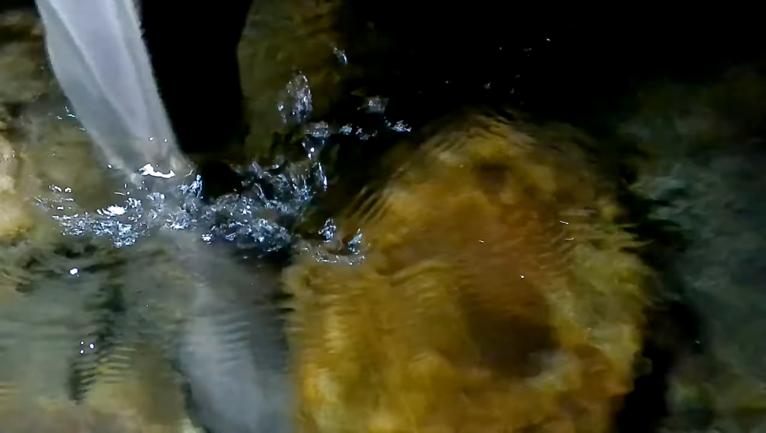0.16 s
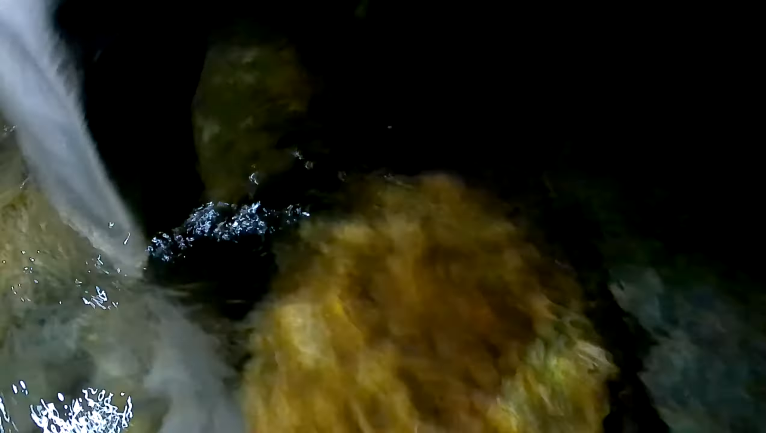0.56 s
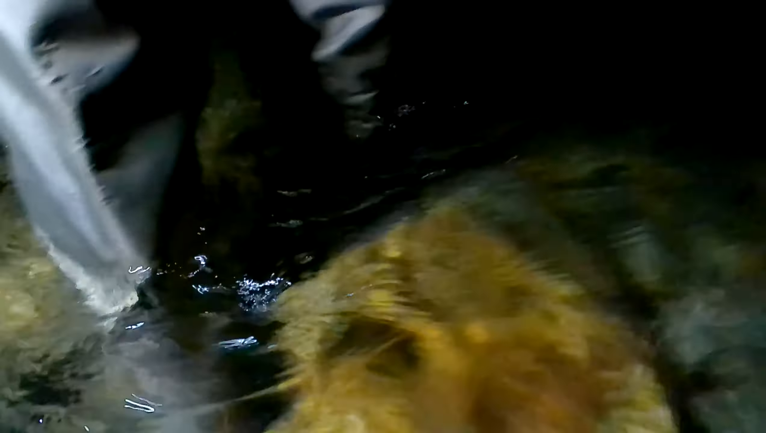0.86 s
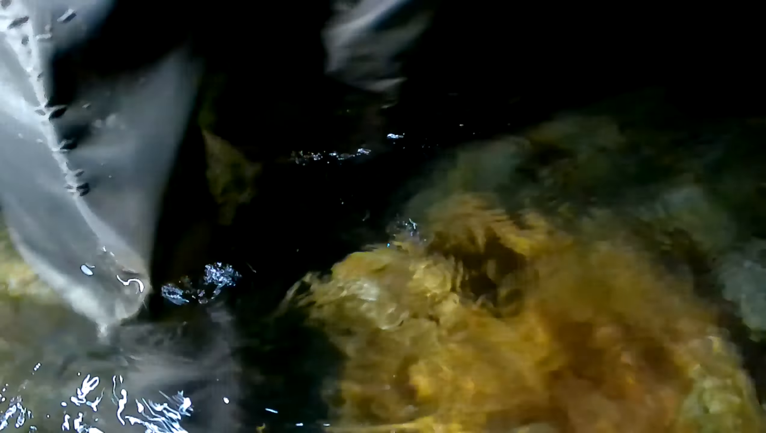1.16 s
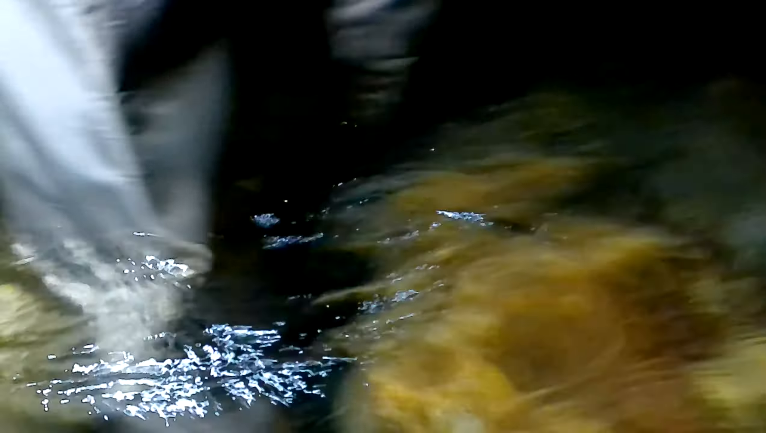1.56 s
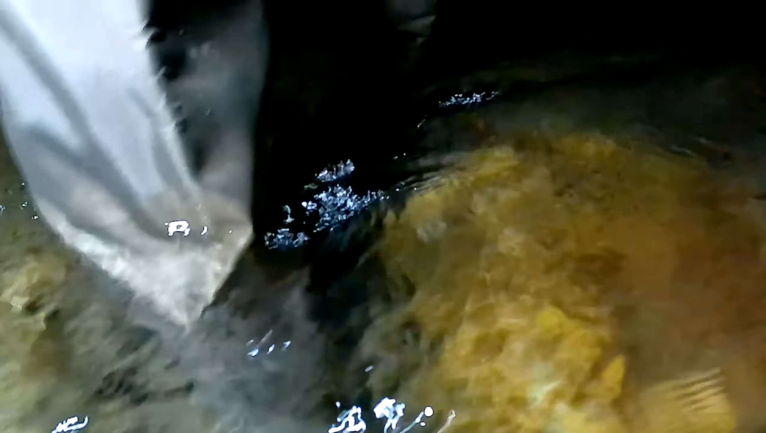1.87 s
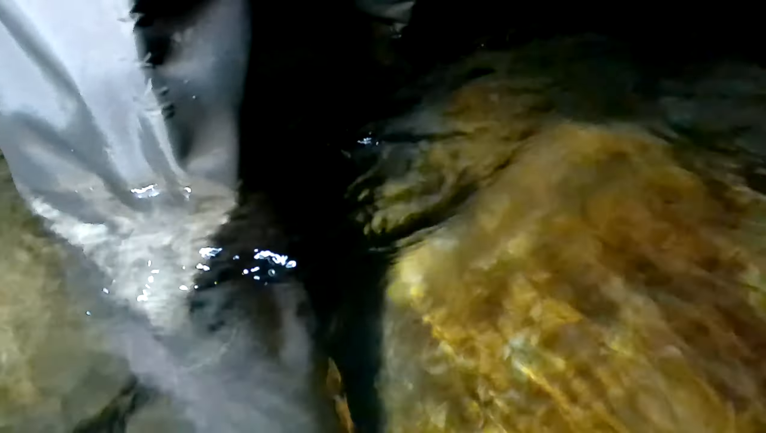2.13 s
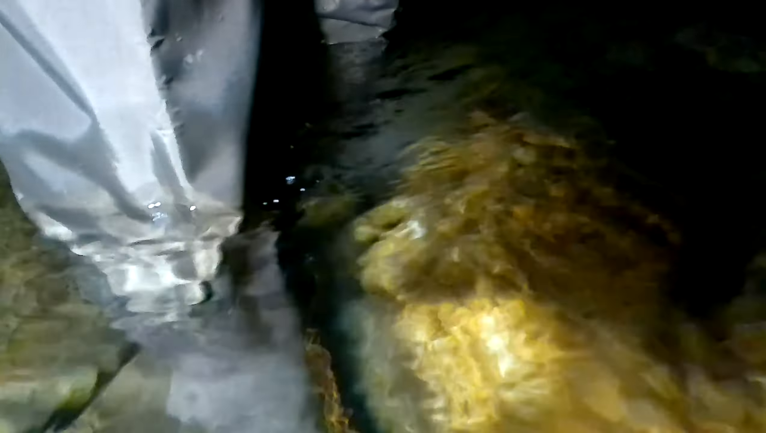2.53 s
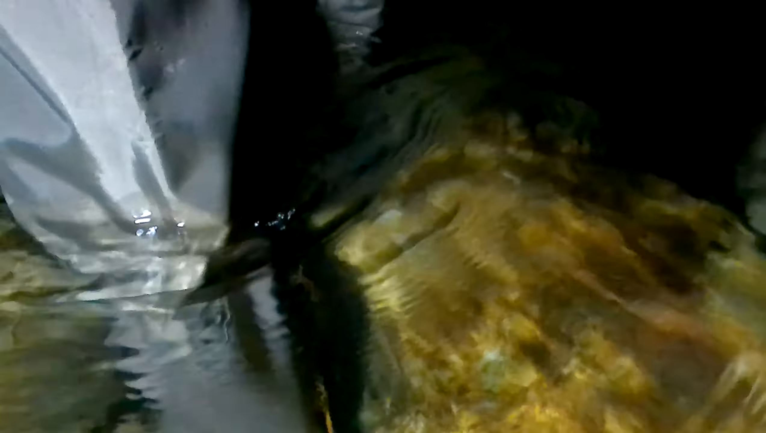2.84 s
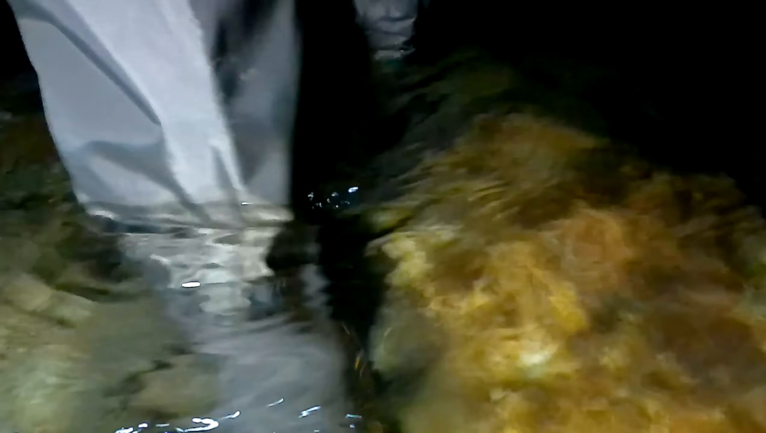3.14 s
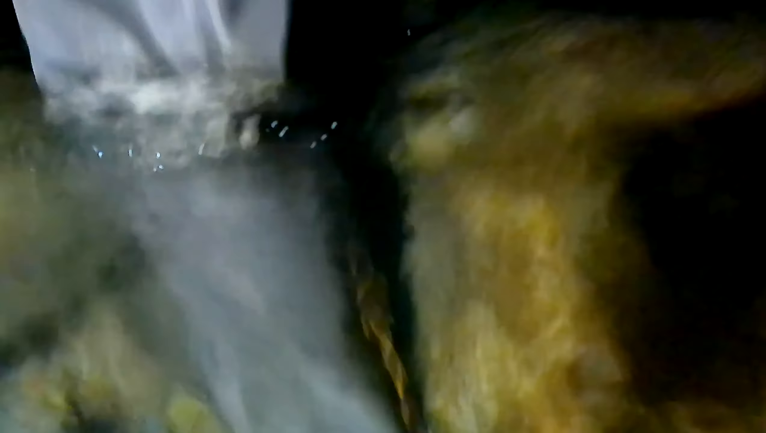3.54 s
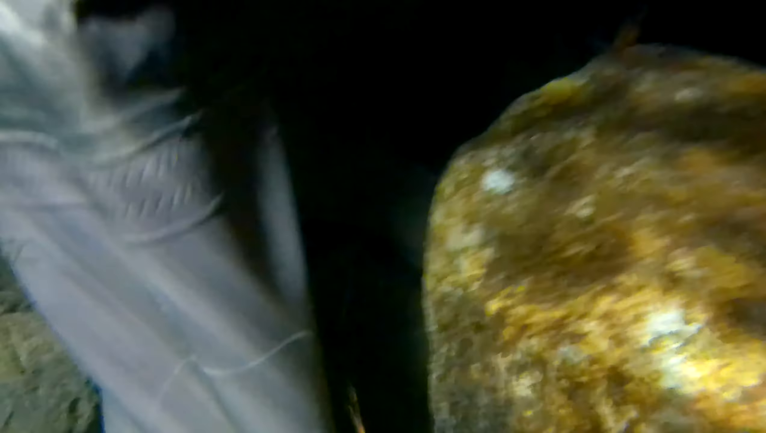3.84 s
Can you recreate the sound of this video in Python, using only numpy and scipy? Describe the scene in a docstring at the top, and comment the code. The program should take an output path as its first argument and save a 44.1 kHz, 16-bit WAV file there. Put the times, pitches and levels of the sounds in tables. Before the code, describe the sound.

Plunge into a rocky stream: faint water bed, handling knocks and small gurgles heard through a hollow waterproof case, nearly two quiet seconds, then abrupt overloaded splash, fizz and falling bubble tones right at the microphone.

```python
"""Over a faint, slowly swelling river bed of filtered noise, someone wades with a microphone in a waterproof case.
Swishes (grains of noise, small bubbles) and knocks of the grip excite the hollow resonances of the case;
low thumps, pushes, faint surface gurgles and touches of fizz join them.
Late on the case plunges under: churning and slaps are shaped noise, and trapped air rings as loud
gliding sines, with bursts of fizz on top; the loudest bubbles overload the microphone."""
import sys
import numpy as np
from scipy import signal
from scipy.io import wavfile
from scipy.ndimage import uniform_filter1d

SR = 44100
rng = np.random.default_rng(int(sys.argv[2]) if len(sys.argv) > 2 else 0)


def log_audio(samples):
    """Write samples as a 16-bit WAV file to the path given in sys.argv[1]."""
    # one column per channel
    frames = np.atleast_2d(samples).T
    # limit to full scale, then quantise
    limited = np.clip(frames, -1, 1)
    pcm = np.round(limited * 32767).astype(np.int16)
    wavfile.write(sys.argv[1], SR, pcm)


N = 176400  # samples: 4 s


def amp(db):
    """Turns decibels into a gain."""
    return 10 ** (np.asarray(db) / 20)


def unit(x):
    """Scales a sound to an RMS of one."""
    return x / np.sqrt(np.mean(x ** 2) + 1e-20)


def add(mix, s, sound):
    """Mixes a sound in at a time in seconds, cut off at the end of the mix."""
    part = mix[max(round(s * SR), 0):][:len(sound)]
    part += sound[:len(part)]


def level(rows, axis=1):
    """Gain over the whole scene from a column of dB values."""
    rows = np.array(rows)
    return amp(np.interp(np.arange(N) / SR, rows[:, 0], rows[:, axis]))


def colour(x, points, size=8192):
    """Minimum-phase filter of unit energy that follows a spectrum, so nothing sounds early."""
    f, db = np.transpose(points)
    hz = abs(np.fft.fftfreq(size, 1 / SR))
    log_gain = np.log(amp(np.interp(np.log(hz + 1), np.log(f), db)))
    spectrum = np.exp(np.conj(signal.hilbert(log_gain)))
    response = np.fft.ifft(spectrum).real[:size // 2]
    return signal.oaconvolve(x, response / np.linalg.norm(response))[:N]


def strike(rise, t60):
    """Envelope: a quick rise, then an exponential fall of 60 dB per t60."""
    t = np.arange(0, rise + 2 * t60, 1 / SR)
    attack = np.sin(np.pi / 2 * np.minimum(t / rise, 1)) ** 2
    decay = np.exp(-np.log(1000) * np.maximum(t - rise / 2, 0) / t60)
    return attack * decay


def bursts(rows):
    """Short puffs of noise from rows of (time [s], level [dB], t60 [s], rise [s])."""
    envelope = np.zeros(N)
    for s, db, t60, rise in rows:
        add(envelope, s, amp(db) * strike(rise, t60))
    return envelope * rng.choice([-1., 1.], N)


def drift(size):
    """Slow random wander of unit RMS: noise smoothed twice over size samples."""
    smooth = uniform_filter1d(rng.standard_normal(N), size)
    return unit(uniform_filter1d(smooth, size))


GRAINS_PER_S, GRAIN_SPREAD_DB = 1800, 3.5  # the spread scales an exponential draw, held to 4


def grains():
    """A dense crackle of clicks of uneven size, at unit RMS."""
    size = amp(GRAIN_SPREAD_DB * np.minimum(rng.exponential(1, N), 4))
    sign = rng.choice([-1., 1.], N)
    return unit(size * sign * (rng.random(N) < GRAINS_PER_S / SR))


def ring(x, modes):
    """Passes a sound through decaying modes, each of unit energy times its gain."""
    t = np.arange(SR // 4) / SR
    response = np.zeros(len(t))
    for k, (hz, db, t60) in enumerate(modes):
        mode = np.exp(-np.log(1000) * t / t60) * np.sin(2 * np.pi * hz * t)
        response += amp(db) * unit(mode) * (-1) ** k  # neighbouring modes have opposite sign
    return signal.oaconvolve(x, response / np.sqrt(len(t)))[:N]


BUBBLE_RISE_CYCLES = 1.1
WOBBLE_CYCLES, BUBBLE_WOBBLE = 2, 0.053  # cycles per random step, relative pitch spread
SURFACING_CLIMB_PER_S, SINKING_FALL_PER_S = 0.4, 0.88  # relative pitch change


def bubble(hz, db, t60, rise, glide):
    """A pocket of air rings at one gliding, slightly wobbling pitch."""
    envelope = strike(rise, t60)
    t = np.arange(len(envelope)) / SR
    wobble = np.interp(t * hz / WOBBLE_CYCLES, np.arange(512), rng.standard_normal(512))
    pitch = hz * np.exp(glide * t) * (1 + BUBBLE_WOBBLE * wobble)
    return amp(db) * envelope * np.sin(2 * np.pi * np.cumsum(pitch) / SR)


def froth(low_hz, high_hz, per_s, cycles, size=N):
    """Many small climbing bubbles of scattered pitch, each with a t60 of the same number of cycles."""
    out = np.zeros(size)
    count = int(per_s * size / SR) + 1
    for when, pitch, strength in rng.random((count, 3)):
        hz = low_hz * (high_hz / low_hz) ** pitch
        pop = bubble(hz, 0, cycles / hz, BUBBLE_RISE_CYCLES / hz, SURFACING_CLIMB_PER_S)
        add(out, when * size / SR, strength * pop)
    return unit(out)


# spectrum of quiet river and microphone hiss: (frequency [Hz], relative density [dB])
RIVER_SPECTRUM = [(30, 2.5), (60, -12.5), (220, -23.5), (1100, -35.5), (1480, -26), (2000, -36.5),
                  (2750, -45), (3500, -37.5), (8000, -49)]
RIVER_DB = -65.5
RUMBLE_SWELL_DB, RUMBLE_EDGE_HZ = 3, 190


def river():
    """Steady faint hiss over a slowly swelling rumble, both from one filtered noise."""
    wash = amp(RIVER_DB) * unit(colour(rng.standard_normal(N), RIVER_SPECTRUM))
    low_pass = signal.butter(2, RUMBLE_EDGE_HZ, fs=SR, output="sos")
    rumble = signal.sosfiltfilt(low_pass, wash)
    swell = amp(RUMBLE_SWELL_DB * drift(size=4000))
    return wash + rumble * (swell - 1)


# swishes of water and grip: (time [s], body level [dB], treble level [dB])
SWISHES = [(0, -70, -92), (.04, -83, -84), (.12, -82, -92), (.18, -64, -83.5), (.26, -98.5, -103),
           (.95, -87, -101), (1.075, -76.5, -104), (1.13, -55.5, -87), (1.18, -76, -100), (1.195, -56, -73),
           (1.248, -56, -76.5), (1.275, -80, -105), (1.295, -53, -67), (1.338, -45.5, -58.5),
           (1.43, -83, -99), (1.5, -53, -77), (1.556, -51.5, -73.5), (1.578, -46.5, -68.5),
           (1.61, -48.5, -64), (1.70, -53, -77), (1.80, -79.5, -96.5), (1.86, -68.5, -79.5),
           (1.882, -54.5, -55), (1.92, -72, -76), (1.95, -56.5, -81), (2.03, -100, -112)]
# a sharp click at the very start, then knocks on the case: (time [s], body level [dB], treble level [dB], thump
# level [dB], rise [s])
KNOCK_HITS = [(.001, -57.5, -87.5, -40, 0.0023), (.185, -69.5, -78, -46, 0.005),
              (1.303, -40.5, -40, -55, 0.0017), (1.332, -35.5, -52, -49.5, 0.0023),
              (1.493, -59, -76, -46.5, .002), (1.572, -50, -80, -31, .005), (1.66, -27, -43.5, -31, 0.0025),
              (1.68, -44, -75, -32, 0.0026), (1.7102, -18.5, -34, -18.5, .0014),
              (1.818, -42.5, -57.5, -50.5, 0.0031), (1.864, -39.5, -47.5, -55, 0.013),
              (1.931, -38, -63, -74, 0.0067), (2.594, -67.5, -89, -54.5, .003)]
# broad tone of the hollow case: (frequency [Hz], relative density [dB])
BODY_SPECTRUM = [(150, -18), (320, -21), (450, -6.5), (570, 4.5), (830, -20), (1150, -8), (1480, 0.5),
                 (2050, -28.5), (2420, -10), (3100, -54)]
TREBLE_SPECTRUM = [(2400, -15.5), (3400, -18), (4050, -2), (4350, 0.5), (4700, -1), (5150, -14),
                   (5600, -14), (6700, -42), (10400, -39.5), (11800, -59.5)]
# narrow rings of the case: (frequency [Hz], level [dB], t60 [s])
BODY_RINGS = [(534.5, -2, .06), (638.5, -7.5, 0.089), (1000, -17, 0.07), (1069, -12.5, .07),
              (1181, -8, 0.038), (1402, -3.5, 0.062), (1520, -15.5, 0.12), (1643, -20, 0.044),
              (1753, -13.5, 0.052), (2256, -16, .03), (2453, -10, 0.017)]
TREBLE_RINGS = [(3970, -6.5, 0.042), (4356, -4, 0.0083), (4530, -4, 0.032), (5500, -16.5, .035),
                (6530, -25, 0.039), (10400, -31, .02)]
# low boom under the swishes: (frequency [Hz], relative density [dB])
BOOM_SPECTRUM = [(60, -19), (175, -2), (330, -30), (1000, -61)]
BOOM_DB, FROTH_DB = -2.5, -2  # relative to the swish
BODY_T60_S, TREBLE_T60_S = 0.043, 0.023  # of the knocks, before the case rings


def case():
    """Swishes, froth and knocks excite the hollow body and the bright rings of the case."""
    swish = grains() * level(SWISHES, axis=1)
    body_knocks = bursts([(s, db, BODY_T60_S, rise) for s, db, _, _, rise in KNOCK_HITS])
    body = swish + body_knocks
    treble_swish = grains() * level(SWISHES, axis=2)
    treble_knocks = bursts([(s, db, TREBLE_T60_S, rise) for s, _, db, _, rise in KNOCK_HITS])
    treble = treble_swish + treble_knocks

    boom = amp(BOOM_DB) * colour(swish, BOOM_SPECTRUM)
    small_bubbles = froth(low_hz=391, high_hz=1962, per_s=110, cycles=60)
    wet = amp(FROTH_DB) * level(SWISHES, axis=1) * unit(colour(small_bubbles, BODY_SPECTRUM))
    hollow = colour(body, BODY_SPECTRUM) + ring(body, BODY_RINGS)
    bright = colour(treble, TREBLE_SPECTRUM) + ring(treble, TREBLE_RINGS)
    return boom + wet + hollow + bright


# low modes of the held case: (frequency [Hz], level relative to the thump [dB], t60 [s])
THUMP_MODES = [(101.6, 3, .11), (170.2, 2, 0.12), (200, -10.5, 0.1202)]
# slow pushes on the case: (time [s], level [dB])
PUSH_HITS = [(0.064, -41), (1.381, -40), (1.575, -31.5), (1.671, -34.5)]
THUMP_RISE_S = 0.0074
PUSH_HZ, PUSH_LENGTH_S = 32.8, 0.039


def thumps():
    """Each knock shakes the low modes of the case; slow pushes add a swing of pressure."""
    out = np.zeros(N)
    for s, _, _, thump_db, _ in KNOCK_HITS:
        for hz, db, t60 in THUMP_MODES:
            envelope = strike(THUMP_RISE_S, t60)
            tone = np.sin(2 * np.pi * hz * np.arange(len(envelope)) / SR)
            add(out, s, amp(thump_db + db) * envelope * tone)
    t = np.arange(0, PUSH_LENGTH_S, 1 / SR)
    swing = np.hanning(len(t)) * np.sin(2 * np.pi * PUSH_HZ * t)
    for s, db in PUSH_HITS:
        add(out, s, amp(db) * swing)
    return out


# gurgles and drips at the surface: (time [s], starting pitch [Hz], peak level [dB], t60 [s])
SURFACE_GURGLES = [(1.333, 540, -37, .05), (.14, 1004, -60.5, 0.18), (.15, 1455, -57, 0.1),
                   (1.005, 614, -55.5, 0.18), (1.122, 550, -48.5, 0.2), (1.192, 534, -42.5, 0.065),
                   (1.228, 493, -44.5, 0.14), (1.356, 1371, -35, 0.11), (1.378, 1458, -36, 0.07),
                   (1.495, 537, -40, .12), (1.57, 569, -36, .12), (1.932, 517, -36.5, 0.054),
                   (1.938, 1150, -47, .15), (2.593, 526, -48.5, .11)]
GURGLE_RISE_S = 0.0049


def gurgles():
    """Faint bubbles near the surface ring with a climbing pitch."""
    out = np.zeros(N)
    for s, hz, db, t60 in SURFACE_GURGLES:
        add(out, s, bubble(hz, db, t60, GURGLE_RISE_S, SURFACING_CLIMB_PER_S))
    return out


# bursts of spray: (time [s], centre pitch [Hz], level [dB], t60 [s])
FIZZ_BURSTS = [(1.302, 5600, -49, 0.054), (1.325, 6000, -62, .2), (3.684, 9900, -50, 0.039),
               (3.715, 9040, -28, 0.017), (3.7253, 8000, -34, .025), (3.743, 5600, -29.5, 0.021),
               (3.807, 8700, -54, .04), (3.8651, 6660, -22, .012), (3.878, 6850, -27.5, 0.013),
               (3.967, 6100, -42, .022)]
FIZZ_PER_S, FIZZ_CYCLES = 2300, 62
FIZZ_OCTAVES = 0.19  # pitch scatter either side of the centre


def fizz():
    """Spray bursts into brief swarms of tiny bubbles of like size."""
    out = np.zeros(N)
    for s, hz, db, t60 in FIZZ_BURSTS:
        envelope = strike(BUBBLE_RISE_CYCLES / hz, t60)
        low_hz, high_hz = hz / 2 ** FIZZ_OCTAVES, hz * 2 ** FIZZ_OCTAVES
        swarm = froth(low_hz, high_hz, FIZZ_PER_S, FIZZ_CYCLES, size=len(envelope))
        add(out, s, amp(db) * envelope * swarm)
    return out


# churning under water: (time [s], level [dB])
CHURN_LEVELS = [(3.672, -130), (3.68, -45), (3.715, -37), (3.755, -61.5), (3.78, -37.5), (3.845, -51),
                (3.88, -35.5), (3.96, -59.5), (4, -46.5)]
# tone of the churning: (frequency [Hz], relative density [dB])
CHURN_SPECTRUM = [(120, 3.5), (800, -3), (1300, -13.5), (2100, -16), (3000, -30), (6000, -32.5),
                  (12000, -55)]
# slaps of water on the case: (time [s], level [dB], t60 [s], rise [s])
SLAP_HITS = [(3.682, -35, 0.044, 0.0028), (3.701, -22, 0.027, 0.0018), (3.7095, -18, .011, 0.00048),
             (3.714, -17.5, 0.022, 0.00092), (3.74, -42.5, 0.068, 0.0027), (3.784, -43.5, 0.019, .003),
             (3.8622, -11.5, 0.017, 0.0018), (3.886, -42, 0.043, .002)]
# tone of the slaps: (frequency [Hz], relative density [dB])
SLAP_SPECTRUM = [(150, -16), (1400, 4), (2700, -12), (3600, -1), (5800, 4), (7200, -8.5), (10600, -26),
                 (12000, -55)]
GARGLE_DB = -2  # relative to the churn


def splash():
    """Water churns and gargles around the case and slaps it: coloured grains, froth and noise puffs."""
    churn_gain = level(CHURN_LEVELS)
    churn = colour(grains() * churn_gain, CHURN_SPECTRUM)
    gargle = amp(GARGLE_DB) * froth(low_hz=298, high_hz=1507, per_s=140, cycles=20) * churn_gain
    slaps = colour(bursts(SLAP_HITS), SLAP_SPECTRUM)
    return churn + gargle + slaps


# bubbles of the plunge: (time [s], starting pitch [Hz], peak level [dB], t60 [s])
PLUNGE_BUBBLES = [(3.684, 432.6, -32.5, 0.15), (3.7018, 1528, 5.5, .015), (3.7093, 4330, -13, 0.032),
                  (3.714, 4605, 16, 0.0062), (3.71, 1486, -12.5, 0.04), (3.718, 4750, -15, 0.021),
                  (3.743, 4890, -16, 0.012), (3.743, 2230, -28, 0.022), (3.7715, 310, -9.5, 0.067),
                  (3.8045, 690, -7, .025), (3.806, 952, -30.5, 0.063), (3.817, 681, -33, 0.064),
                  (3.830, 1008, -26, 0.12), (3.829, 313, -19.5, 0.064), (3.841, 283, -21, .04),
                  (3.863, 1480, -20.5, 0.019), (3.8645, 642, -3.5, 0.02), (3.871, 793, -18, 0.072),
                  (3.8865, 807, -8.5, 0.044), (3.888, 602, -13.5, 0.033), (3.887, 2054, -21.5, 0.024),
                  (3.894, 6050, -22.5, .015), (3.917, 237.4, -8, 0.068), (3.918, 689, -23.5, 0.097),
                  (3.918, 1890, -40, 0.02), (3.942, 787, -33, 0.063), (3.968, 6180, -23, 0.013),
                  (3.983, 1780, -49.5, 0.045)]


def plunge():
    """Trapped air rings as bubbles, mostly loud, whose pitch falls as they sink."""
    out = np.zeros(N)
    for s, hz, db, t60 in PLUNGE_BUBBLES:
        add(out, s, bubble(hz, db, t60, BUBBLE_RISE_CYCLES / hz, -SINKING_FALL_PER_S))
    return out


def scene():
    """River, case, thumps, gurgles and fizz, then the splash and bubbles of the plunge."""
    return (river() + case() + thumps() + gurgles() + fizz() + splash() + plunge())[None]


CEILING, KNEE, OVERLOAD_SHARE = 0.85, 5, 0.16  # full scale = 1; share of clipping in the mix
DULL_ABOVE_HZ, DULL_LEAK = 11300, 0.12  # treble above this edge is made fainter, to this gain
EDGE_HZ = 15800


def soften(dry, size):
    """Holds a sound under the ceiling according to its momentary size."""
    return dry / (1 + (size / CEILING) ** KNEE) ** (1 / KNEE)


def record(dry):
    """A fast limiter flattens the loudest bubbles, which also clip a little; fainter treble, then band limit."""
    limited = soften(dry, abs(signal.hilbert(dry)))  # follows the envelope
    clipped = soften(dry, abs(dry))  # follows the waveform, so it distorts
    low_pass = signal.butter(8, min(DULL_ABOVE_HZ, SR / 2 - 1), fs=SR, output="sos")
    dull = signal.sosfiltfilt(low_pass, limited)
    out = dull + DULL_LEAK * (limited - dull) + OVERLOAD_SHARE * (clipped - limited)
    band = signal.firwin(511, EDGE_HZ, window=("kaiser", 9), fs=SR)
    return signal.oaconvolve(out, band[None], "same")


dry = scene()
out = record(dry)
log_audio(out)
```